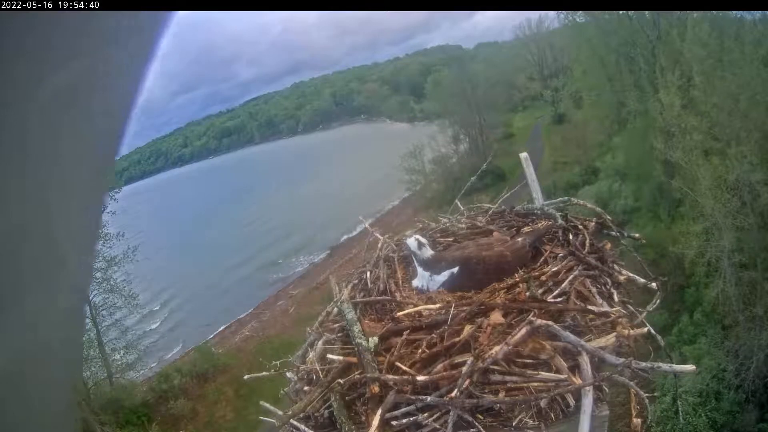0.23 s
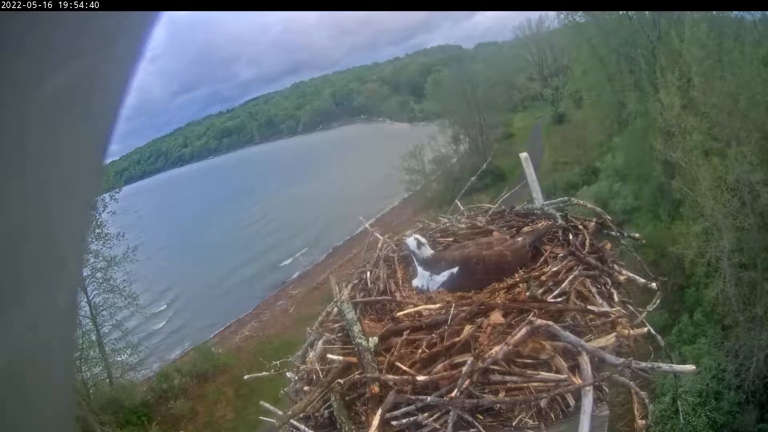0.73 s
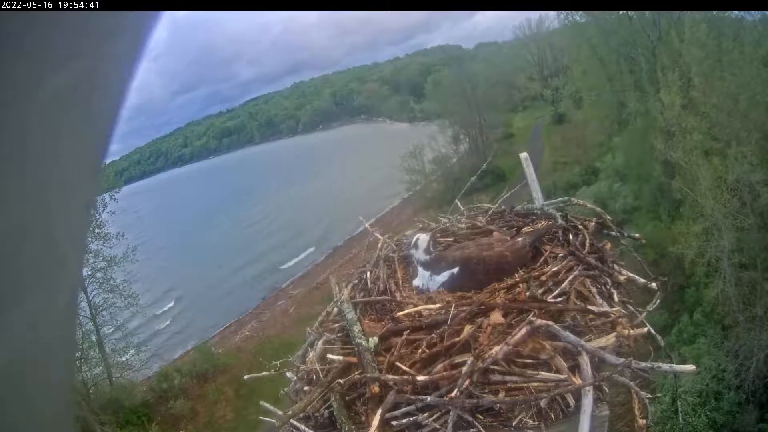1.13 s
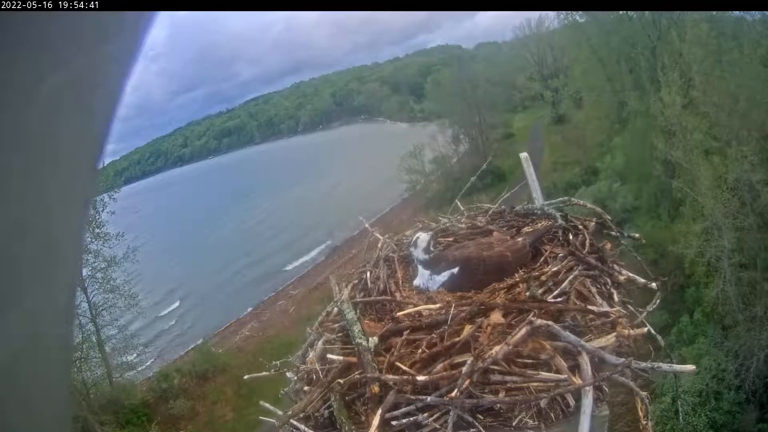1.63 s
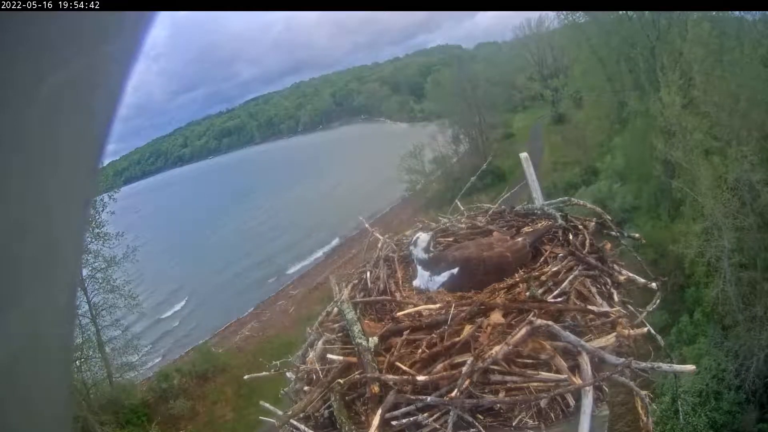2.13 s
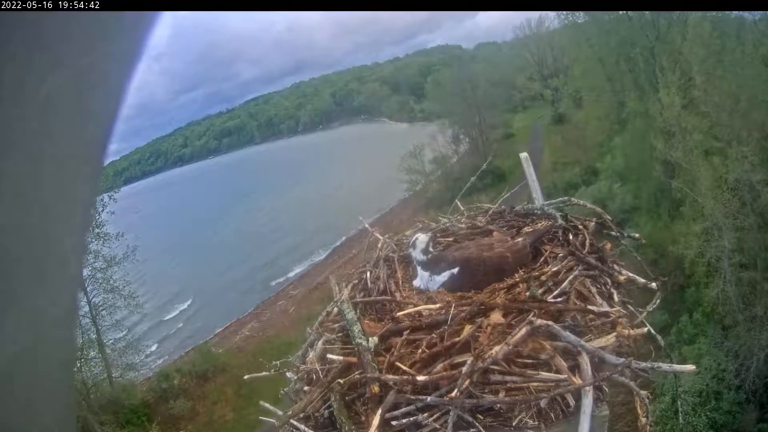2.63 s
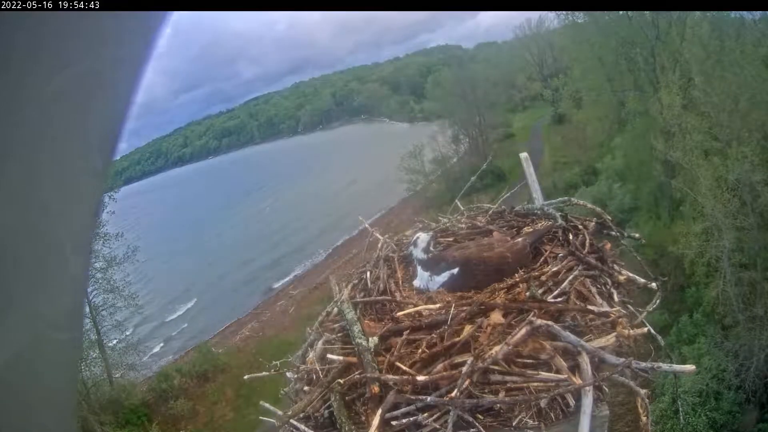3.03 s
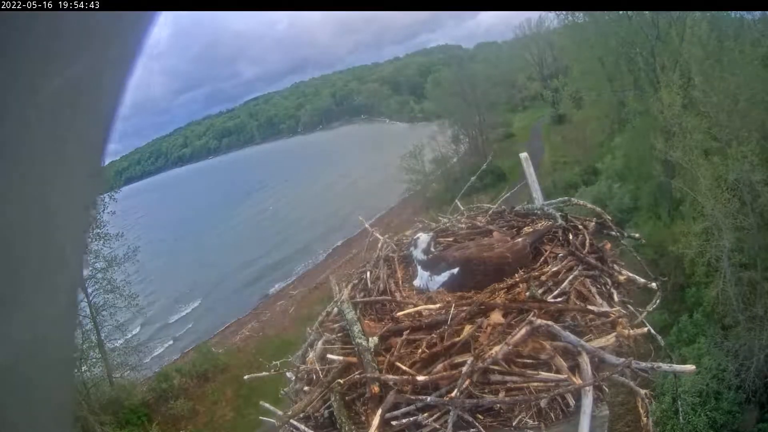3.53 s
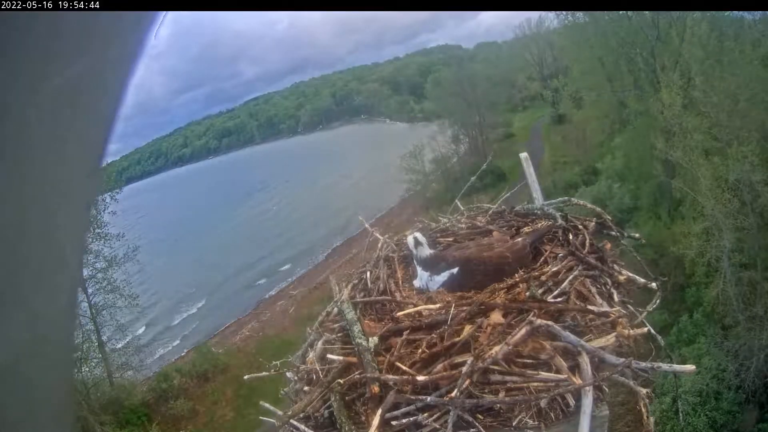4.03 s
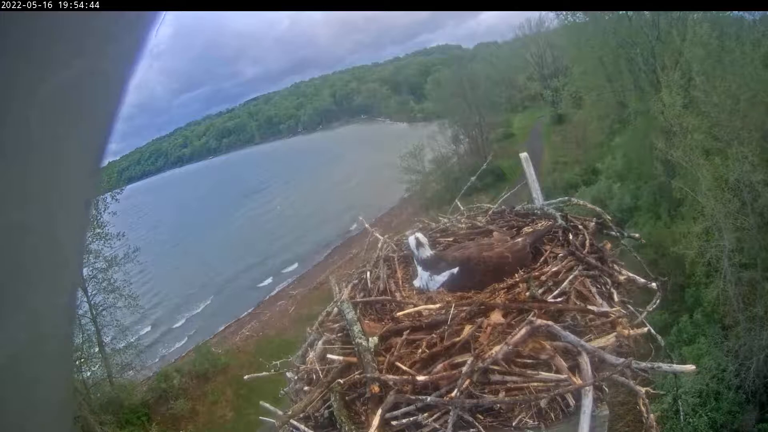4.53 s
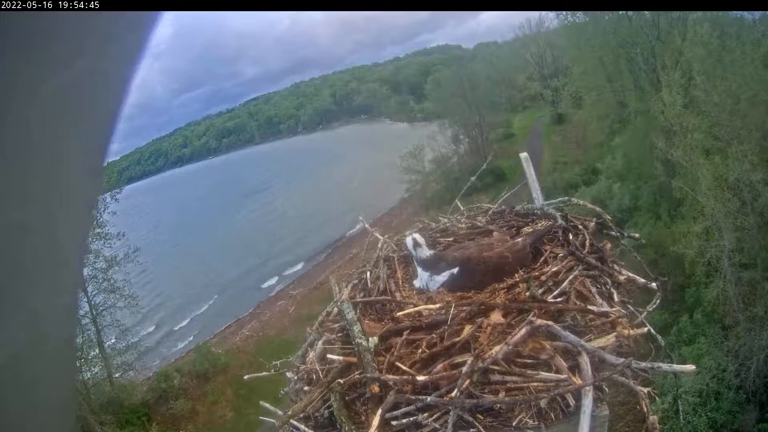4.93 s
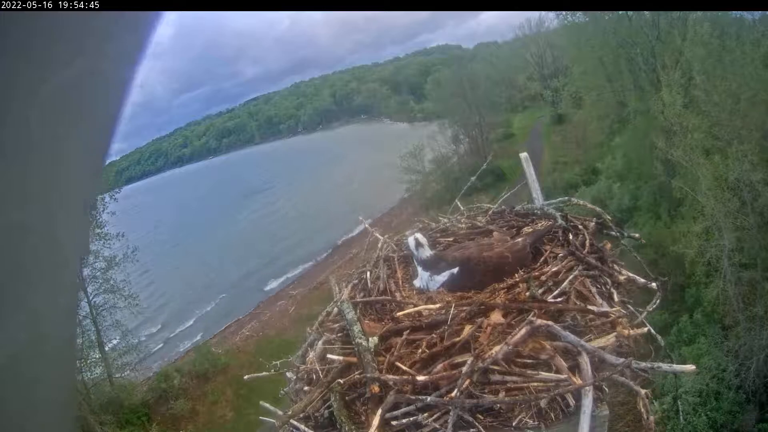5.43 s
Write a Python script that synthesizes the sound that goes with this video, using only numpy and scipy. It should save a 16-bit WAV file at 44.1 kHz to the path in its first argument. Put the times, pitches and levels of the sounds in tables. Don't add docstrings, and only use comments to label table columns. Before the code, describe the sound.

Short piercing bird whistles, each sliding downward, repeat roughly once a second over low wind buffeting and a faint hiss of surf and leaves.

```python
import sys
import numpy as np
from scipy import signal
from scipy.fft import rfft, irfft
from scipy.io import wavfile
from scipy.ndimage import uniform_filter1d, minimum_filter1d

SR = 44100
rng = np.random.default_rng(int(sys.argv[2]) if len(sys.argv) > 2 else 0)


def bounce(signal):
    frames = np.transpose(np.atleast_2d(signal))
    limited = np.clip(frames, -1, 1)
    pcm = np.round(limited * 32767).astype(np.int16)
    wavfile.write(sys.argv[1], SR, pcm)


def gain_from_db(level_db):
    decades = np.asarray(level_db, float) / 20
    return 10 ** decades


N = 250047

# (start [s], bend [s], pitch at the bend [Hz], effort [dB], octave with the beak nearly shut [dB])
LEVEL_CHIRPS = [
    (-.014, .034, 2708, -14, 4),
    (3.209, 3.254, 2701, -13.5, -6),
    (4.110, 4.149, 2704, -12, 0),
    (4.988, 5.027, 2509, -10.5, -8.5),
]
# (time [s], pitch [Hz], effort [dB], octave strength [dB])
SWOOPS = [
    [(0.97, 4290, -65, 1.8), (0.974, 4030, -36, 7), (0.997, 3277, -14.5, 9.5), (1.04, 3080, -14.5, -10),
     (1.052, 2945, -21, 7.5), (1.088, 2495, -11.5, -8), (1.105, 2264, -20.5, 3), (1.112, 2200, -61, -3)],
    [(2.306, 5260, -50, -6), (2.312, 4950, -40, 2), (2.332, 4000, -31, -10), (2.354, 3523, -7, 2),
     (2.388, 3147, -19, 9.5), (2.429, 2750, -14, -9.5), (2.457, 2303, -28.5, -4), (2.462, 2230, -67, -2)],
]
# (time from the start [s], effort [dB])
SWELL = [(0, -32.5), (.007, -18.5), (.013, -9), (.04, -2.5), (.06, 0.1), (.1, .3)]
# (pitch [Hz], effort [dB])
FADE = [(1960, -37), (2060, -16.5), (2170, -11), (2290, -1), (2380, 0)]
# (frequency [Hz], gain [dB])
THROAT = [(2000, -5), (2200, -9), (2350, -1.5), (2450, 1), (2550, 2.5), (2650, 0.5), (2750, 1), (2900, -3),
          (3050, -3.5), (3200, -4), (3400, -3.5), (3600, 0), (3900, 5), (5000, 4)]
# (frequency [Hz], gain [dB])
BEAK = [(4200, -18.5), (4500, -27), (4750, -19.5), (5000, -12.5), (5200, -9), (5400, -8), (5550, -12.5),
        (5750, -8), (6000, -13.5), (6250, -21.5), (6500, -39), (6900, -36), (7300, -34), (7900, -53.5)]
# (frequency [Hz], gain [dB])
THIRD_PARTIAL = [(6000, -48), (6900, -31.5), (7400, -35), (7800, -38.5), (8100, -42), (9500, -81.5)]
# (delay [ms], bounce [dB], breath noise [dB])
BOUNCES = [(2.0, -30, -32), (2.5, -14, -24), (2.17, -3, -23.5), (2.0, -30, -30), (2.0, -30, -29),
           (2.0, -30, -33)]
# (time [s], length [s], level [dB])
CRACKS = [
    (.02, 0.012, -53),
    (1.005, 0.0079, -18.5),
    (1.03, 0.0036, -31),
    (5.015, 0.011, -33.5),
]
# (delay [s], level [dB])
NEST_ECHOES = [(.013, -33), (.022, -33)]
# (time [s], level [dB])
GUSTS = [(0, -28), (.25, -18), (.36, -35), (.65, -19), (.78, -29.5), (1.05, -21), (1.5, -26), (1.75, -31.5),
         (2.1, -29), (2.25, -31), (2.68, -24.5), (3.2, -24), (3.6, -26.5), (3.84, -29), (4.25, -22),
         (4.7, -26), (5.25, -26.5), (5.67, -25.5)]
# (time [s], half length [s], rumble [dB], flutter re rumble [dB])
BUFFETS = [(0, 0.011, -5.5, -10.5), (0.13, 0.043, -32, -14), (0.278, .04, -24.5, -19),
           (0.511, 0.083, -18.5, -15.5), (0.64, .03, -19, -2), (.9, 0.05, -26.5, -6.5),
           (1.011, 0.052, -19, -21), (1.217, 0.011, -37, -8), (1.447, 0.035, -28, -9),
           (1.675, 0.034, -32, -19), (2.393, 0.033, -24.5, -6), (2.666, 0.051, -32.5, -8),
           (2.92, 0.046, -39, -4), (3.244, 0.033, -17.5, -10), (3.573, 0.089, -32.5, -5.5),
           (4.161, 0.019, -28, -6.5), (4.387, .04, -26, -9), (4.497, 0.046, -32.5, 1.5),
           (4.636, 0.033, -30, -12), (4.867, 0.074, -21, -10), (5.098, 0.064, -32, -4),
           (5.46, 0.046, -23.5, -4.5), (5.646, 0.035, -27.5, -26), (1.074, 0.042, -28.5, 0),
           (2.119, 0.017, -32.5, -16), (2.326, 0.023, -28, -8.5), (3.1, 0.053, -30, -5),
           (3.91, 0.024, -35, -10), (4.965, 0.024, -27, -5)]
# (time [s], depth [dB], sharpness [Hz])
EDDIES = [(0.137, -20.5, 80), (0.232, -19.5, 62), (0.417, -23.5, 50), (0.452, -17.5, 100),
          (0.477, -18.5, 50), (0.493, -12.5, 80), (0.506, -20.5, 63.4), (0.526, -10.5, 100),
          (0.553, -21, 99), (0.615, -11.5, 125), (0.636, -21, 63), (0.645, -4.5, 105), (0.671, -12.5, 80),
          (0.927, -20.5, 63), (0.955, -7.5, 63), (0.971, -12, 102), (0.992, -27, 63.6), (1.013, -12, 50),
          (1.222, -18.5, 102), (1.406, -22.5, 63), (3.234, -15, 63), (3.245, -13.5, 100), (3.349, -20, 63),
          (4.154, -20.5, 63), (4.484, -20.5, 50), (4.524, -16, 80), (5.013, -15, 63), (5.157, -19, 100),
          (5.48, -17, 63), (5.494, -16, 62)]
# (frequency [Hz], density [dB per Hz])
SHORE_SPECTRUM = [(150, -2.5), (350, -4.5), (700, -1.5), (1000, -7.5), (1200, -3.5), (1400, -8.5),
                  (1720, -3.5), (1920, -7), (2120, -13), (3400, -18), (4300, -15.5), (5800, -19),
                  (7000, -21.5), (9000, -23.5)]
# (time [s], level [dB])
SHORE_LEVEL = [(0, -42.5), (1.499, -45), (2.599, -43), (4.199, -44.5), (5.67, -43.5)]
# (frequency [Hz], gain [dB])
LINK_ROLLOFF = [(6600, 0), (7200, -3), (7800, -8.5), (8400, -15.5), (9000, -46), (9400, -101)]


def level(x, db):
    return x * gain_from_db(db) / np.sqrt(np.mean(x ** 2))


def gain_at(table, hz):
    f, db = np.transpose(table)
    return gain_from_db(np.interp(np.log(hz + 1), np.log(f), db))


def band(x, lo_hz, hi_hz, order=2):
    return signal.sosfilt(signal.butter(order, [lo_hz, hi_hz], "band", fs=SR, output="sos"), x)


def walk(rate_hz):
    hold = int(SR / rate_hz)
    steps = np.repeat(rng.standard_normal(N // hold + 1), hold)
    return 1.54 * uniform_filter1d(uniform_filter1d(steps, hold), hold)[:N]


def smooth(x):
    return uniform_filter1d(uniform_filter1d(x, size=260, mode="nearest"), size=260, mode="nearest")


def level_chirp(start, bend, bend_hz, db, shut_db):
    rise_hz_per_s, fall_hz_per_s, bend_s = 7050, 12100, .0306
    open_hz, open_spread_hz, open_octave_db = 2474, 21, 9
    s = np.arange(start, bend + 4 * bend_s, 1 / 1000)
    turn = (s - bend + np.hypot(s - bend, bend_s) - bend_s) / 2
    hz = bend_hz + rise_hz_per_s * (s - bend) - (rise_hz_per_s + fall_hz_per_s) * turn
    hz = hz + (600 + 42 * shut_db) * np.exp((start - s) / .0051)
    fade_db = np.interp(hz, *np.transpose(FADE))
    effort_db = db + np.interp(s - start, *np.transpose(SWELL)) + fade_db
    opening = (s > bend) / (1 + np.exp((hz - open_hz) / open_spread_hz))
    shut_db = shut_db - .04 * np.maximum(bend_hz - hz, 0) * (s > bend)
    octave_db = shut_db + opening * (open_octave_db - shut_db) + 0.52 * fade_db
    return np.array([s, hz, effort_db, octave_db])[:, hz > FADE[0][0]]


def chirps():
    plain = [level_chirp(*row) for row in LEVEL_CHIRPS]
    swooping = [np.transpose(swoop) for swoop in SWOOPS]
    return sorted(plain + swooping, key=lambda chirp: chirp[0][0])


def bird():
    out, t = np.zeros(N), np.arange(N) / SR
    waver, air = walk(300), band(rng.standard_normal(N), 2500, 6300)
    crack = sum(gain_from_db(db) * np.exp(-((t - at) / length) ** 2) for at, length, db in CRACKS)
    for (s, *columns), (delay_ms, bounce_db, air_db) in zip(chirps(), BOUNCES):
        i = np.arange(int(max(s[0], 0) * SR), int(s[-1] * SR))
        hz, effort_db, octave_db = (smooth(np.interp(i / SR, s, c)) for c in columns)
        phase = 2 * np.pi * np.cumsum(hz * (1 + 0.002 * waver[i])) / SR
        beam = np.abs(1 + gain_from_db(bounce_db) * np.exp(2j * np.pi * 2 * hz * delay_ms / 1000))
        tone = smooth(gain_at(THROAT, hz)) * np.sin(phase)
        tone = tone + crack[i] * np.sin(1.5 * phase)
        tone = tone + gain_from_db(octave_db) * beam * smooth(gain_at(BEAK, 2 * hz)) * np.cos(2 * phase)
        tone = tone + gain_at(THIRD_PARTIAL, 3 * hz) * np.sin(3 * phase)
        edge = np.clip(np.minimum(i / SR - s[0], s[-1] - i / SR) / 0.0052, 0, 1)
        out[i] = np.sqrt(2) * edge * smooth(gain_from_db(effort_db)) * (tone + gain_from_db(air_db) * air[i])
    return out


def nest(x):
    scatter_db, scatter_t60_s = -28, .22
    t = np.arange(int(.15 * SR)) / SR
    decay = np.exp(-np.log(1000) * t / scatter_t60_s)
    build_up = np.clip(t / 0.031, 0, 1) ** 2
    scatter = rng.standard_normal(len(t)) * decay * build_up
    response = level(scatter, scatter_db) / np.sqrt(len(t))
    response[0] = 1
    for delay, db in NEST_ECHOES:
        response[int(delay * SR)] += gain_from_db(db)
    return signal.fftconvolve(x, response)[:N]


def wind():
    s = np.arange(N) / SR
    heave_db = np.interp(s, *np.transpose(GUSTS))
    mean_push_db = -26
    push_db = heave_db - mean_push_db
    rumble_gain = gain_from_db(mean_push_db - 13 + 1.1 * push_db)
    flutter_gain = gain_from_db(mean_push_db - 20 + 0.99 * push_db)
    for at, half, db, bright_db in BUFFETS:
        shape = gain_from_db(db) * np.exp(-((s - at) / half) ** 2)
        rumble_gain = rumble_gain + shape
        flutter_gain = flutter_gain + gain_from_db(bright_db) * shape
    burst = walk(24.985)
    heave = level(band(rng.standard_normal(N), 3.26, 32.7), 0)
    heave = heave * gain_from_db(heave_db + 2.25 * walk(12) + 1.5 * burst)
    rumble = level(band(rng.standard_normal(N), 35.3, 88.0) * gain_from_db(2.2 * burst), -3.0) * rumble_gain
    flutter = level(band(rng.standard_normal(N), 47, 219.5), 0)
    flutter = flutter + level(band(rng.standard_normal(N), 180, 510), -14)
    flutter = level(flutter * gain_from_db(2.4 * burst), -5.5) * flutter_gain
    out, t = heave + rumble + flutter, np.arange(-1300, 1301)
    for at, db, hz in EDDIES:
        u = (np.pi * hz * t / SR) ** 2
        out[int(at * SR) + t] -= gain_from_db(db) * ((1 - 2 * u) * np.exp(-u) + 0.23 * np.exp(-14 * u))
    return out


def shore():
    hz = np.arange(N // 2 + 1) * SR / N
    spectrum = rfft(rng.standard_normal(N)) * gain_at(SHORE_SPECTRUM, hz)
    reference = np.sqrt(np.mean(irfft(spectrum * (hz > 500) * (hz < 1900), N) ** 2))
    edges = 100 * 2 ** np.arange(0, 7, .5)
    out = np.zeros(N)
    for lo, hi in zip(edges, edges[1:]):
        out += irfft(spectrum * (hz >= lo) * (hz < hi), N) * gain_from_db(0.73 * walk(4.58))
    s, db = np.transpose(SHORE_LEVEL)
    return out / reference * gain_from_db(np.interp(np.arange(N) / SR, s, db))


def scene():
    return (nest(bird()) + wind() + shore())[None, :]


def link(x, mask_db, tilt_db, grain_db, patchy):
    hz, _, z = signal.stft(x, SR, nperseg=2048)
    width = 16
    power = (np.abs(z[:-1]) ** 2).reshape(-1, width, z.shape[1]).mean(axis=1)
    centre = hz[width // 2::width][:, None]
    treble = centre > 2000
    chance = np.repeat(rng.standard_normal(power.shape), 2, axis=1)[:, :power.shape[1]]
    loudest = -minimum_filter1d(-(power * treble).max(axis=0), size=2, origin=0)
    floor_db = mask_db + tilt_db * np.clip((centre - 5700) / 700, 0, 1)
    floor_db = floor_db + 7.2 * (np.abs(centre - 3270) < 200) + 2.6 * chance
    floor = loudest * gain_from_db(2 * floor_db)
    keep = np.repeat((power > floor) | ~treble, width, axis=0)
    patch = np.kron(rng.random((len(keep) // 4, keep.shape[1])), np.ones((4, 3)))[:, :keep.shape[1]]
    keep = keep & (patch > patchy * np.clip((hz[:-1, None] - 6800) / 1200, 0, 1))
    grain = np.repeat(np.sqrt(power) * treble, width, axis=0) * gain_from_db(grain_db)
    grain = grain * np.exp(2j * np.pi * rng.random(keep.shape))
    z[:-1] = (z[:-1] + grain) * keep * gain_at(LINK_ROLLOFF, hz[:-1])[:, None]
    return signal.istft(z, SR, nperseg=2048)[1][:N]


def top_cut(x):
    return signal.sosfilt(signal.butter(12, 9150, fs=SR, output="sos"), x)


def record(dry):
    link_rate_hz, offset = 16000, .0135
    x = link(dry[0], mask_db=-50, tilt_db=4, grain_db=-27, patchy=.4)
    mirror = band(x * np.cos(2 * np.pi * link_rate_hz * np.arange(N) / SR), 8100, 8780, order=6)
    mix = (x + gain_from_db(-14.5) * mirror + offset)[None, :]
    return top_cut(mix)


dry = scene()
out = record(dry)
bounce(out)
```